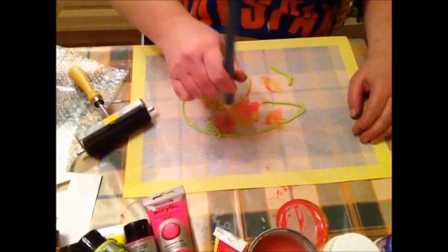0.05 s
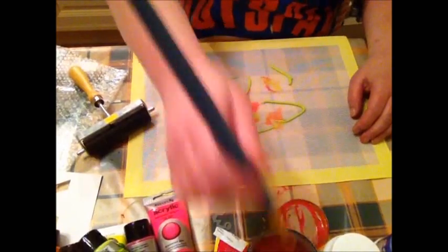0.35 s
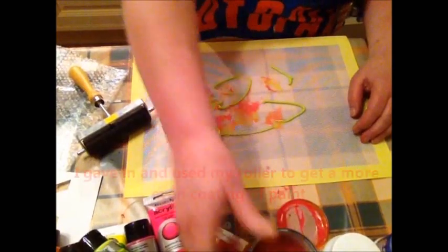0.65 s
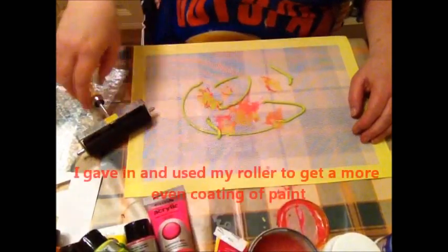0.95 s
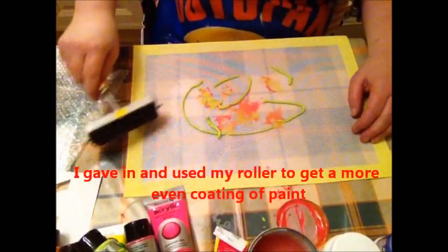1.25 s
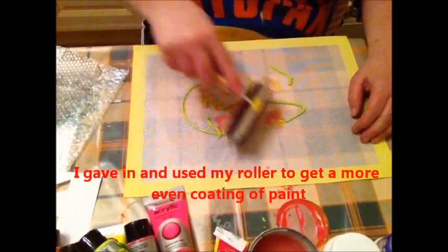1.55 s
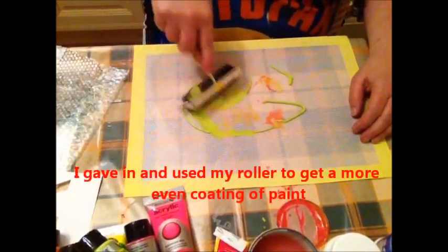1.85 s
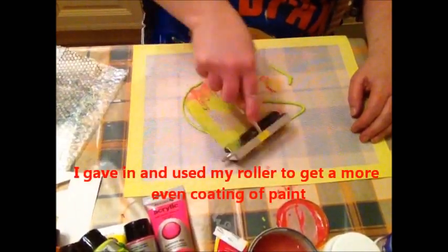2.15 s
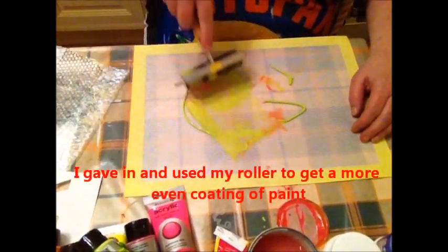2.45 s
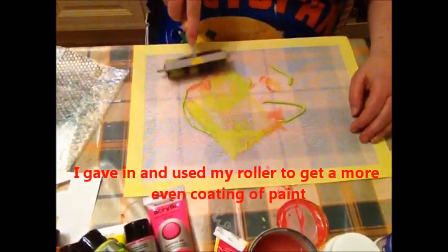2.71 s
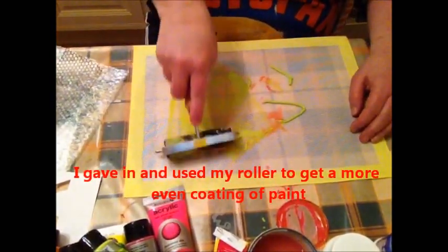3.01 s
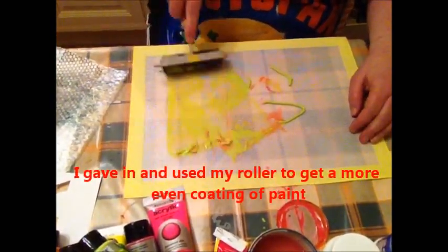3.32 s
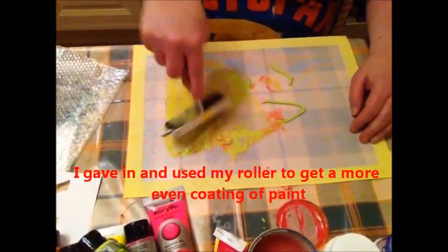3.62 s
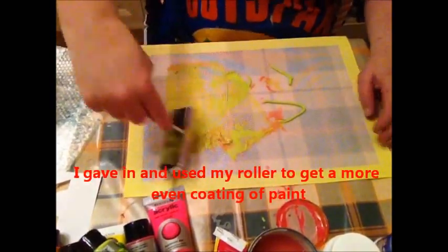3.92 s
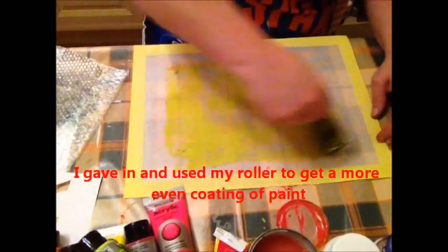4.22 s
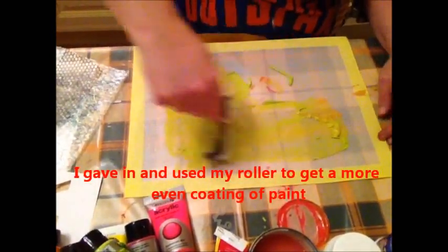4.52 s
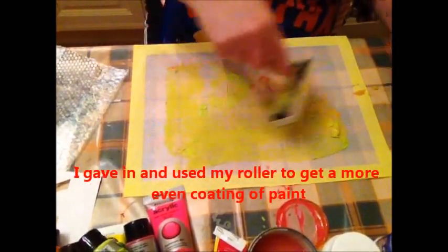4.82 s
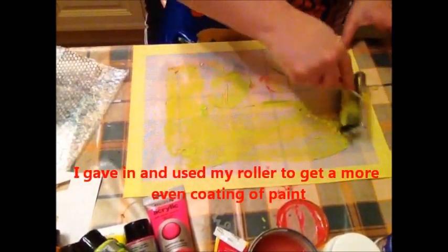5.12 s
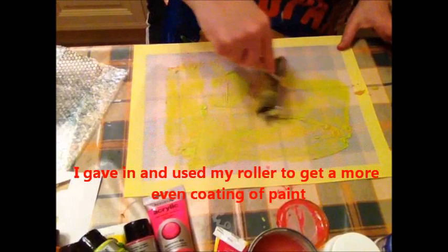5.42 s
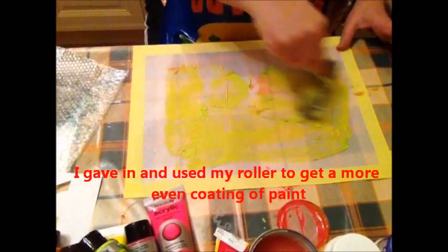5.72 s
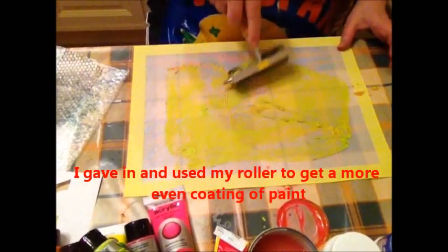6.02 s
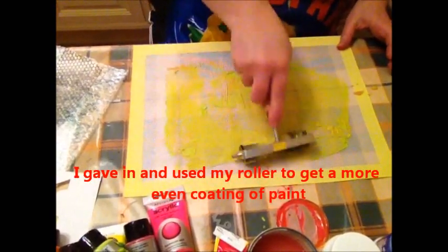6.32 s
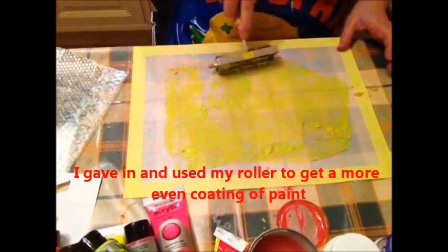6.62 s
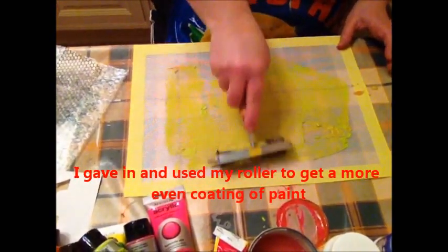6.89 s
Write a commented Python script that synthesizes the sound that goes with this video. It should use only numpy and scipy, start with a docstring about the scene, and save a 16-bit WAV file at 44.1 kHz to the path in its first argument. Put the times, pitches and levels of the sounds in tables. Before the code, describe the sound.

In a small room with a faint hiss, a paintbrush drops on a table with a light knock. Bubble wrap rustles briefly as a rubber roller is picked up. The roller thuds down and rolls back and forth through wet paint, rumbling, squelching and crackling, while its loose metal frame clinks sharply at each lift and landing. Just past the middle, its axle groans twice. Everything sounds fairly close.

```python
"""Over a faint hiss, a hand and a paintbrush graze a craft table, and the brush drops with a knock.
A rubber roller is dragged off bubble wrap; its loose metal frame clinks at every lift and landing,
and the table thuds under it. Then it rolls back and forth through wet paint: the table top rumbles
while the paint squelches, crackles and now and then smacks or squeaks. Just past the middle, the axle
groans on two fast strokes. A small room echoes behind it all."""
import sys
import numpy as np
from scipy import signal
from scipy.fft import rfft, irfft, next_fast_len
from scipy.io import wavfile

SR = 44100
rng = np.random.default_rng(int(sys.argv[2]) if len(sys.argv) > 2 else 0)


def int16_out(signal):
    """Quantize to a 16-bit WAV file."""
    q = np.round(np.clip(np.atleast_2d(signal).T, -1, 1) * 32767)
    wavfile.write(sys.argv[1], SR, q.astype(np.int16))


N = 315315
TIME = np.arange(N) / SR
AGE = TIME[:SR * 3 // 5]   # seconds since a blow


def from_db(db):
    """Turn decibels into a number to multiply by."""
    return 10 ** (np.asarray(db) / 20)


def rms_one(x):
    """Scale a sound so that its average strength (rms) is 1."""
    return x / np.sqrt(np.mean(x ** 2) + 1e-20)


def at_hz(points, hz):
    """Read between the rows of a (pitch, value) table, with octaves evenly spaced."""
    pitches, values = np.transpose(points)
    return np.interp(np.log(np.maximum(hz, 1)), np.log(pitches), values)


def colour(x, *curves):
    """Shape a sound's bass and treble with (Hz, dB) curves, then set its strength to 1."""
    size = next_fast_len(len(x))
    hz = np.fft.rfftfreq(size, 1 / SR)
    gain = from_db(sum(at_hz(curve, hz) for curve in curves))
    return rms_one(irfft(rfft(x, size) * gain, size)[:len(x)])


def cut_bass(x, hz, order):
    """Weaken everything below hz; a higher order cuts more steeply."""
    return signal.sosfilt(signal.butter(order, hz, "high", fs=SR, output="sos"), x)


def fade(t60):
    """Die away after a blow, falling 60 dB in t60 seconds."""
    return from_db(-60 * AGE / max(t60, 1e-4))


def add(track, start, sound):
    """Mix a sound into a track at a start time in seconds."""
    i = max(int(start * SR), 0)
    track[i:i + len(sound)] += sound[:max(N - i, 0)]


def drift(per_s, size):
    """Wander about zero, heading for a new random value per_s times a second."""
    targets = rng.standard_normal(4000)
    return np.interp(np.arange(size) / SR * per_s, np.arange(len(targets)), targets)


def grains(per_s, spread_db, size=N):
    """Tiny impacts at random times; spread_db sets how much their sizes vary."""
    sizes = from_db(spread_db * np.minimum(rng.exponential(1, size), 4))
    return sizes * rng.choice([-1, 1], size) * (rng.random(size) < per_s / SR)


def friction(length, hz, octaves, spread_db=0.0, per_s=13000):
    """A short swell of tiny impacts around one pitch; octaves sets how wide the band is."""
    size = int(length * SR)
    hump = [(hz * 2 ** (k * octaves), -6 * k * k) for k in range(-3, 4)]
    impacts = grains(per_s, spread_db, size=len(AGE))[:size]
    return colour(impacts, hump) * np.sin(np.linspace(0, np.pi, size))


def strike(tones, curve, scatter_db, detune):
    """Ring an object's natural tones; grip and spot vary their strength and pitch from blow to blow."""
    out = 0
    for hz, db, t60 in tones:
        gain = from_db(db + at_hz(curve, hz) + scatter_db * rng.normal()) * rng.choice([-1, 1])
        pitch = hz * (1 + detune * rng.normal())
        out = out + gain * fade(t60) * np.sin(2 * np.pi * pitch * AGE)
    return out


def hand_move(start, length, swell_db, speed_up_s=0.04, slow_down_s=0.05):
    """The strength of one hand movement: speed up, swell or fade along the way, slow down."""
    age = TIME - start
    speed = np.clip(np.minimum(age / speed_up_s, (length - age) / slow_down_s), 0, 1)
    return speed * from_db(swell_db * (np.clip(age / length, 0, 1) - .5))


# How long the room echoes. Each row: pitch in Hz, seconds to fall 60 dB.
ECHO_TIMES = [(110, 0.46), (300, 0.43), (1500, 0.5), (5000, 0.47), (9000, 0.39), (15000, 0.23)]

def room(x, wet_db, gap_s):
    """Add fresh random echoes that start after gap_s and die sooner in the treble."""
    tail, edges = 0, np.geomspace(70, 18000, 9)
    for low, high in zip(edges, edges[1:]):
        band_filter = signal.butter(2, [low, high], "band", fs=SR, output="sos")
        band = signal.sosfilt(band_filter, rng.standard_normal(len(AGE)))
        tail = tail + band * fade(at_hz(ECHO_TIMES, np.sqrt(low * high)))
    echoes = signal.fftconvolve(x, tail * np.clip(AGE / gap_s - 1, 0, 1))[:len(x)]
    return x + from_db(wet_db) * echoes * np.linalg.norm(x) / np.linalg.norm(echoes)


# The tone of the background hiss. Each row: pitch in Hz, level in dB.
HISS_CURVE = [(18, -58.5), (30, -13), (49, -34), (123, -4.5), (197, 2), (307, -0.5), (467, 3), (505, -3),
              (2420, -9), (2760, -11.5), (2990, -9), (4090, -11), (15500, -17.5)]

def hiss(db=-60):
    """A faint, steady hiss fills the room."""
    return from_db(db) * colour(rng.standard_normal(N), HISS_CURVE)


# Blows on the table. Each row: start in seconds, level in dB, pitch in Hz above which the blow
# weakens, bass boom in dB.
TABLE_BLOWS = [(0.01, -55.5, 450, 13), (1.177, -42, 343, -2), (1.677, -14, 525, -19),
               (1.684, -4, 1290, -23), (1.688, -2.5, 1240, -14), (2.719, -22.5, 940, -7),
               (2.731, -19.5, 1000, -10), (2.751, -20, 834, 0), (3.952, -23, 480, -18),
               (3.996, -14, 282, -11), (4.001, -24.5, 960, -15), (4.112, -25, 610, -9),
               (5.106, -21, 376, -25), (5.145, -10, 666, -22), (5.165, -17, 560, -25),
               (5.438, -34.5, 701, -15), (6.1, -28.5, 693, -0.5), (6.12, -21.5, 620, 1.5)]
# The table's natural tones. Each row: pitch in Hz, level in dB, ring time in seconds.
TABLE_TONES = [(114, -5.5, 0.5), (142, 1, 0.14), (175, -1, 0.08), (233.5, 0, 0.14), (355.4, 1.5, 0.12),
               (478, 7, 0.071), (532, -0.5, 0.061), (585, -6.5, 0.077), (673, 3.5, 0.052), (827, -1, .07),
               (1070, -13, 0.09), (1090, -5, 0.083), (1280, -12, .05)]
# The tone of the dull push. Each row: pitch in Hz, level in dB.
PUSH_CURVE = [(50, -39.5), (85, -51.5), (115, -17), (175, 3), (235, 10.5), (310, -7), (450, -5.5), (720, 2),
              (950, -6), (1400, -4), (1800, -8.5), (3500, 3.5)]

def thuds(push_db=-3, push_t60=0.045, ring_db=-18, usual_boom_db=-10, rise_s=0.0012):
    """Rubber lands on the table: a dull push and a ring; a short, hard contact reaches higher tones."""
    out = np.zeros(N)
    for start, db, top_hz, boom_db in TABLE_BLOWS:
        contact = [(140, boom_db - usual_boom_db), (190, 0), (top_hz, 0),
                   (2 * top_hz, -23), (10 * top_hz, -46)]
        push = colour(rng.standard_normal(len(AGE)), PUSH_CURVE, contact) * fade(push_t60)
        push *= np.linalg.norm(fade(push_t60)) / np.linalg.norm(push)   # even out chance loudness
        ring = strike(TABLE_TONES, contact, scatter_db=4.5, detune=0.0032)
        onset = 1 - np.exp(-AGE / rise_s)
        blow = onset * (from_db(push_db) * push + from_db(ring_db) * ring)
        add(out, start, room(from_db(db) * blow, wet_db=-4.5, gap_s=0.0039))
    return cut_bass(out, hz=98, order=4)   # a table top gives off little deep bass


# Light touches. Each row: start in seconds, length in seconds, level in dB, centre pitch in Hz.
GRAZES = [(0.045, 0.029, -55.5, 2060), (0.049, 0.025, -59, 8000), (0.53, 0.047, -58, 4870),
          (0.804, 0.054, -50.5, 7260), (0.932, 0.055, -52, 3220), (1.48, .19, -58.5, 1710)]

def grazes():
    """Brush and hand rub over the things on the table."""
    out = np.zeros(N)
    for start, length, db, hz in GRAZES:
        add(out, start, from_db(db) * friction(length, hz, octaves=1.25))
    return out


# The brush drops and bounces once. Each row: start in seconds, level in dB, hardness as treble in dB.
BRUSH_LANDINGS = [(0.7627, -30.5, -2), (0.787, -32.5, -17)]
# The tones of its knock. Each row: pitch in Hz, level in dB, ring time in seconds.
BRUSH_TONES = [(118.8, -14.5, 0.59), (137, -8.5, 0.15), (181, 0, 0.071), (414, -4, 0.047),
               (490, -0.5, 0.058), (620, -9, 0.022), (757, 8.5, 0.028), (773, 1.5, 0.038), (870, -3, 0.028),
               (1010, -13, 0.022), (2040, 1, .008), (4210, 2, 0.012)]

def brush(tick_db=-7):
    """The paintbrush knocks down among the pots; a hard contact makes its handle tick."""
    out = np.zeros(N)
    for start, db, hard_db in BRUSH_LANDINGS:
        knock = strike(BRUSH_TONES, [(250, 0), (800, hard_db)], scatter_db=1.5, detune=0.0033)
        add(knock, 0, from_db(tick_db + hard_db) * friction(length=0.009, hz=2800, octaves=1.25))
        add(out, start, room(from_db(db) * knock, wet_db=-1.0, gap_s=0.0019))
    return cut_bass(out, hz=100, order=2)


# The tone of rustling bubble wrap. Each row: pitch in Hz, level in dB.
WRAP_CURVE = [(290, -30.5), (500, -3.5), (686, -12), (737, -11.5), (1330, -3), (1650, -2.5), (14400, -5),
              (15500, -6.5)]

def bubble_wrap(db=-44.5):
    """The wrap rustles as the roller is dragged off it."""
    drag = hand_move(start=1.083, length=0.14, swell_db=-3.5)
    return from_db(db) * drag * colour(grains(per_s=7200, spread_db=3.0), WRAP_CURVE)


# The axle slides, then clinks. Each row: clink time in seconds, level in dB, then the low tones,
# main ring, treble and first snap as changes in dB, and the length of the slide in seconds.
AXLE_HITS = [(1.2271, -15, -4.5, 4, -4, -2.5, .005), (1.4348, -19.5, -0.5, 0.5, -8, -12, .008),
             (1.677, -17.5, 3, 2, -1, -16, 0.0091), (1.6841, -13.5, 5.5, -12, 1, -13.5, 0.0061),
             (2.43, -16.5, -0.5, -1.5, 0.5, -7, 0.0058), (2.525, -27, -6, -6, -5, -14, 0.0064),
             (2.609, -24.5, 0, -2, -4, -10, 0.0037), (2.716, -7.5, -7, 1.5, -0.5, -17, 0.0048),
             (2.7329, -17.5, 0.5, 2, -3, -2, 0.014), (3.675, -21.5, 0, 1, 1, -10, 0.0023),
             (3.8779, -20.5, 0.5, 2.5, 0.5, -6, 0.012), (3.9525, -13.5, -9.5, -8.5, 0, -10, 0),
             (3.9593, -20, -14, -6, -12, -5, 0.008), (3.9935, -20.5, -1, 1, -10, 5, 0),
             (4.6392, -20, -3.5, 0.5, 2, -7, 0), (4.687, -35.5, 9, -11, -6, -10, 0.0054),
             (4.8846, -22, -3.5, 1, -1, -9, .008), (5.02, -25, -1.5, -2, -8, -22, .014),
             (5.1057, -9.5, -11, -8.5, 1, 3, 0), (5.905, -27.5, -2, -5.5, -7, -6, .01),
             (6.0176, -21, -4.5, 0.5, 1.5, -10, .006), (6.066, -28, -17, -2, -2, -4, 0.0069),
             (6.1, -19.5, 2, -9, -6.5, -16, 0.012), (7.121, -37, 0, -3, -6, -12, 0.0023),
             (7.1424, -23, -3.5, -1, -16, -13, .006)]

def slides(db=-42.5, overlap_s=0.004):
    """While the roller is in the air, its axle scrapes along the frame up to the stop where it clinks."""
    out = np.zeros(N)
    for hit_time, *_, length in AXLE_HITS:
        if length > .002:
            scrape = friction(length + overlap_s, hz=2300, octaves=1.12)
            add(out, hit_time - length, from_db(db) * scrape)
    return out


# The metal frame's natural tones. Each row: pitch in Hz, level in dB, ring time in seconds.
FRAME_TONES = [(1415, -12, 0.036), (1478, -8, 0.056), (3840, -21.5, 0.013), (5780, -21.5, 0.035),
               (5650, -7, 0.032), (6100, -22.5, 0.11), (7650, -20.5, 0.035), (8330, -4.5, 0.0278),
               (8910, -8, 0.035), (8750, -3, 0.076), (9600, -26, .025), (11760, -6.5, 0.027),
               (11740, -24, 0.022), (13050, 7.5, 0.011), (14700, -15.5, .02)]
# The dry crack of metal on metal. Each row: pitch in Hz, level in dB.
CRACK_CURVE = [(120, -29), (400, -8.5), (900, -7), (1400, 4.5), (2600, -6.5), (3700, 2), (4900, -3),
               (5750, 3.5), (6500, -5), (9000, 2), (10500, -3.5), (11400, 19), (12600, -13), (14000, 5)]

def clinks(crack_db=-4, crack_t60=0.021, rattle_s=0.042, snap_t60=0.0037, ring_db=-11, rise_s=0.00005):
    """The axle drops in its holes: snap, crack and ring; a harder blow rattles longer and is brighter."""
    out = np.zeros(N)
    for start, db, low_db, main_db, treble_db, snap_db, _ in AXLE_HITS:
        force = from_db(db)
        tilt_db = 11 * force
        contact = [(1800, low_db), (3300, 0.007), (7600, 0), (8750, main_db), (10000, 0.0095),
                   (11350, treble_db - 5 - tilt_db), (13300, treble_db - 12 + tilt_db)]
        snap = from_db(snap_db) * fade(snap_t60)
        rattle = from_db(crack_db) * fade(crack_t60 + rattle_s * force)
        crack = colour(rng.standard_normal(len(AGE)), CRACK_CURVE, contact) * (snap + rattle)
        ring = from_db(ring_db) * strike(FRAME_TONES, contact, scatter_db=-1.0, detune=0.011)
        onset = 1 - np.exp(-AGE * force / rise_s)   # light touches ease in, hard ones snap
        add(out, start, room(force * onset * (crack + ring), wet_db=-3.5, gap_s=0.0032))
    return cut_bass(out, hz=300, order=2)   # thin metal gives off no bass


# Pushes and pulls of the roller. Each row: start in seconds, length in seconds, then the levels of
# rumble, axle buzz and wet paint in dB, and the swell from start to end in dB.
STROKES = [(1.786, 0.18, -43.5, -52, -55, -12), (1.981, 0.22, -43, -40.5, -50, 1),
           (2.216, 0.19, -42.5, -43, -50, 10), (2.872, 0.18, -52.5, -50.5, -57.5, -28),
           (3.088, 0.28, -44, -48, -53, -8.5), (3.376, 0.26, -44, -46, -54.5, -10),
           (4.049, 0.3, -42.5, -47.5, -55, -9), (4.339, 0.26, -41, -47.5, -53.5, 6),
           (5.226, 0.17, -54, -52, -60, -5), (5.44, 0.22, -50.5, -50, -59, -6.5),
           (5.683, 0.22, -44.5, -53.5, -60, -27.5), (6.177, 0.17, -54.5, -58, -63, -15),
           (6.368, 0.28, -48.5, -55, -60, -9), (6.658, 0.3, -53, -59.5, -66, -4),
           (6.953, 0.15, -47.5, -56.5, -61, -8)]
# The tones of table, axle, wet paint and snapping threads. Each row: pitch in Hz, level in dB.
RUMBLE_CURVE = [(50, -97), (100, -14), (140, -12.5), (175, -4.5), (228, 4), (285, -3), (320, -19.5),
                (360, -11), (500, -45.5)]
BUZZ_CURVE = [(250, -52), (350, 3), (420, 2), (470, 4), (540, 0.5), (620, -0.5), (700, -4), (850, -8.5),
              (1000, -11.5), (1400, -31)]
SQUELCH_CURVE = [(700, -70), (1100, 9.5), (1500, 12.5), (2000, 7.5), (2700, -1.5), (4000, -13), (7000, -35)]
CRACKLE_CURVE = [(2000, -2.5), (3800, 2.5), (6000, -3), (9000, -1), (15000, -5.5)]

def rolling(lumpy_db=2.2, sticky_db=4.5, pops_db=-8, crackle_db=-58.5, usual_paint_db=-50.5):
    """The roller rumbles over ridges of paint, and threads of paint snap as the film splits behind it."""
    rumble, buzz, squelch, crackle = np.zeros((4, N))   # how strong each is over time
    for start, length, rumble_db, buzz_db, paint_db, swell_db in STROKES:
        effort = hand_move(start, length, swell_db)
        rumble += from_db(rumble_db) * effort
        buzz += from_db(buzz_db) * effort
        squelch += from_db(paint_db) * effort
        wetness = from_db(paint_db - usual_paint_db) * effort
        crackle += from_db(crackle_db) * wetness ** 0.29   # follows the paint level only weakly
    lumps = from_db(lumpy_db * drift(per_s=48, size=N))
    bumps = rumble * colour(grains(per_s=2300, spread_db=2.5), RUMBLE_CURVE)
    axle = buzz * colour(grains(per_s=2500, spread_db=3.5), BUZZ_CURVE)
    wet_paint = colour(grains(per_s=950, spread_db=-0.5), SQUELCH_CURVE)
    film = squelch * (wet_paint + from_db(pops_db) * pops())
    threads = crackle * colour(grains(per_s=11000, spread_db=6.5), CRACKLE_CURVE)
    stickiness = from_db(sticky_db * (drift(per_s=35, size=N) - .5))
    return lumps * (bumps + axle + film * stickiness) + threads


def pops(low_hz=1200, high_hz=2700, sizes=12, ring_cycles=22):
    """Air pockets in the paint pop and ring briefly, each at a pitch set by its size."""
    out = np.zeros(N)
    for hz in np.geomspace(low_hz, high_hz, sizes):
        ring = np.sin(2 * np.pi * hz * AGE) * fade(ring_cycles / hz)
        out += signal.oaconvolve(grains(per_s=14, spread_db=2.5), ring[:2048])[:N]
    return rms_one(out)


# Squashed blobs of paint. Each row: start in seconds, level in dB, centre pitch in Hz.
PAINT_BLOBS = [(2.319, -48.5, 1900), (2.985, -55, 7000), (3.135, -46.5, 3620), (3.425, -58, 1890),
               (3.604, -46.5, 5450), (4.105, -44.5, 4310), (4.535, -44.5, 3420), (5.452, -52.5, 6570),
               (5.698, -62, 1660), (6.529, -50.5, 4340)]

def blobs():
    """A thick blob of paint bursts under the roller with a short wet smack."""
    out = np.zeros(N)
    for start, db, hz in PAINT_BLOBS:
        smack = friction(length=0.03, hz=hz, octaves=1.64, spread_db=4.5, per_s=7000)
        add(out, start, from_db(db) * smack)
    return out


# Squeaks of paint. Each row: start in seconds, length in seconds, level in dB, centre pitch in Hz.
PAINT_PEELS = [(3.62, 0.015, -43, 1696), (6.72, 0.21, -59, 1970)]

def peels():
    """Tacky paint peels off the rubber with a narrow, squeaky hiss."""
    out = np.zeros(N)
    for start, length, db, hz in PAINT_PEELS:
        add(out, start, from_db(db) * friction(length, hz, octaves=0.35))
    return out


# Groans on fast strokes. Each row: start in seconds, length in seconds, level in dB, then the
# first, middle and last pitch in Hz.
AXLE_GROANS = [(4.14, 0.13, -38.5, 463, 466, 450), (4.445, 0.092, -36.5, 511, 528, 444)]

def groans(waver=0.022, overtone_db=-17):
    """The axle sticks and slips, making a wavering note that rises a little and falls."""
    out = np.zeros(N)
    for start, length, db, *pitches in AXLE_GROANS:
        along = np.linspace(0, 1, int(length * SR))
        hz = np.interp(along, [0, .5, 1], pitches) * (1 + waver * drift(per_s=150, size=len(along)))
        phase = 2 * np.pi * np.cumsum(hz) / SR
        note = np.sin(phase) + from_db(overtone_db) * np.sin(3 * phase)
        add(out, start, from_db(db) * np.sin(np.pi * along) * note)
    return out


def scene():
    """Everything on the table, heard in the room over a faint hiss."""
    wrap = bubble_wrap()
    background = hiss()
    handling = room(grazes() + wrap + slides(), wet_db=-1.0, gap_s=0.0014)
    painting = room(rolling() + blobs() + peels(), wet_db=-4, gap_s=0.0065)
    return (clinks() + thuds() + brush() + handling + painting + groans() + background)[None]


def record(dry):
    """Round off the loudest peaks and cut the treble above 15400 Hz."""
    treble_cut = signal.ellip(10, .1, 80, 15400, fs=SR, output="sos")
    return signal.sosfilt(treble_cut, np.tanh(dry))


dry = scene()
out = record(dry)
int16_out(out)
```